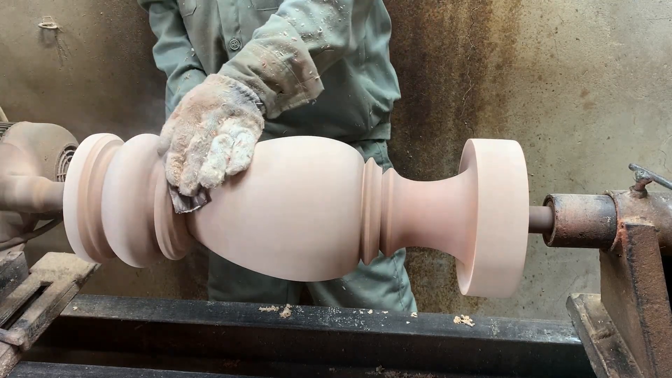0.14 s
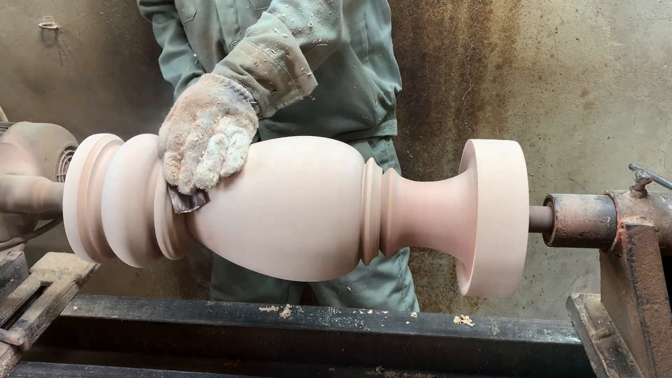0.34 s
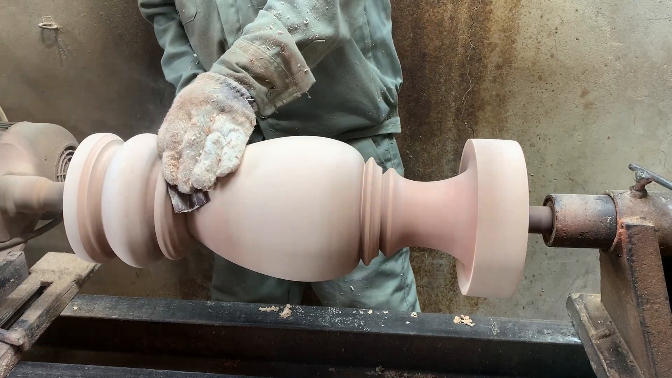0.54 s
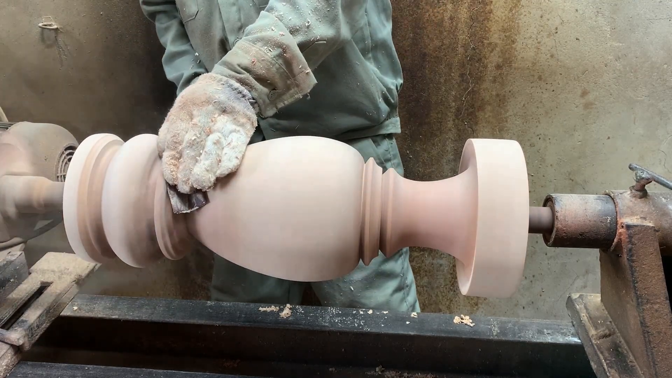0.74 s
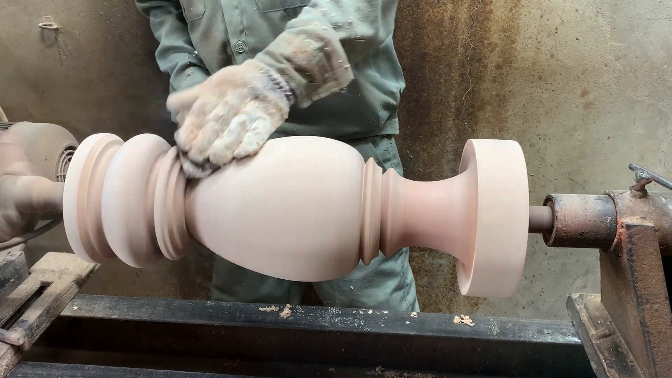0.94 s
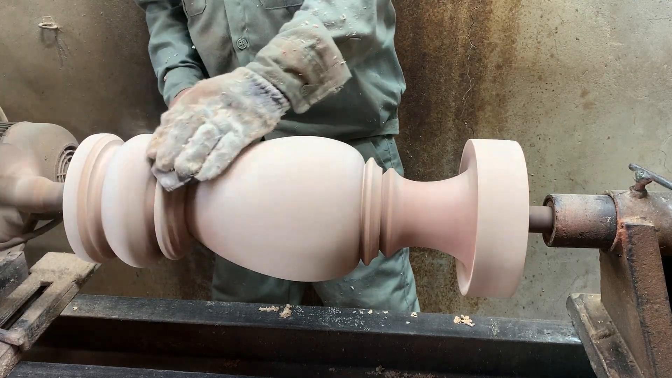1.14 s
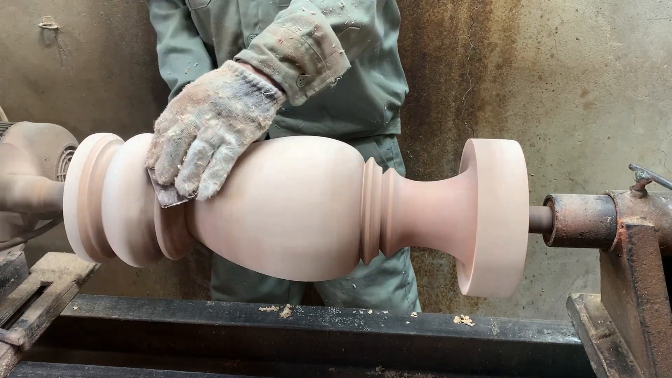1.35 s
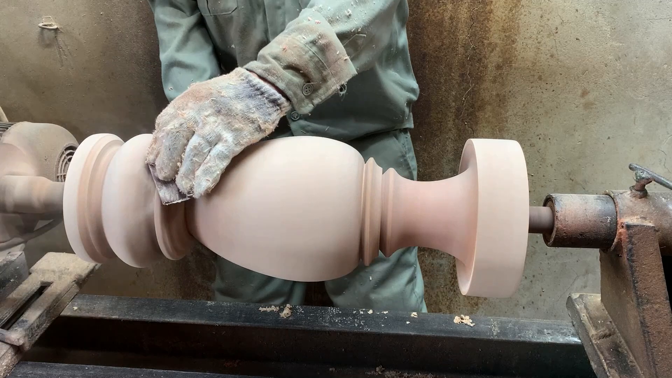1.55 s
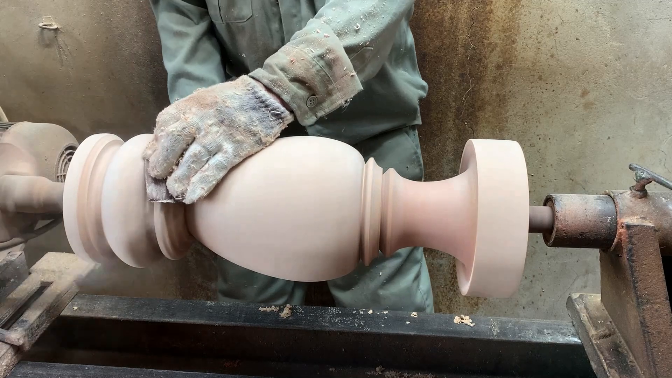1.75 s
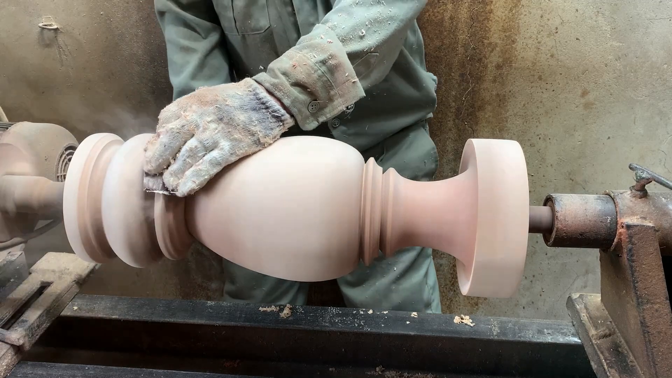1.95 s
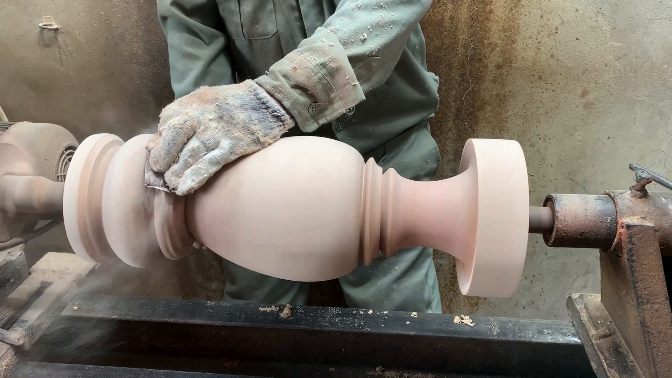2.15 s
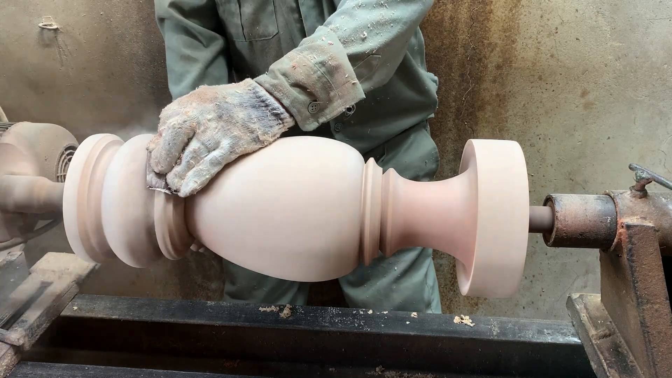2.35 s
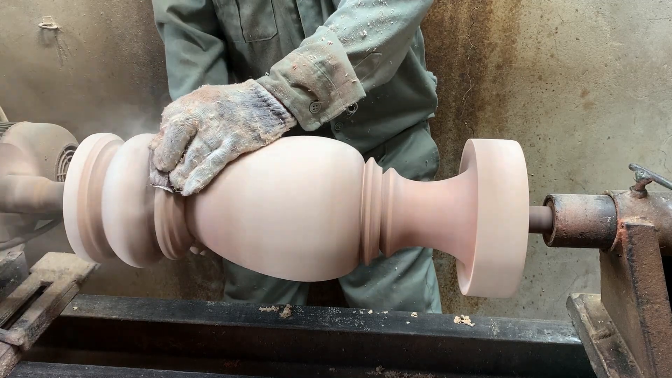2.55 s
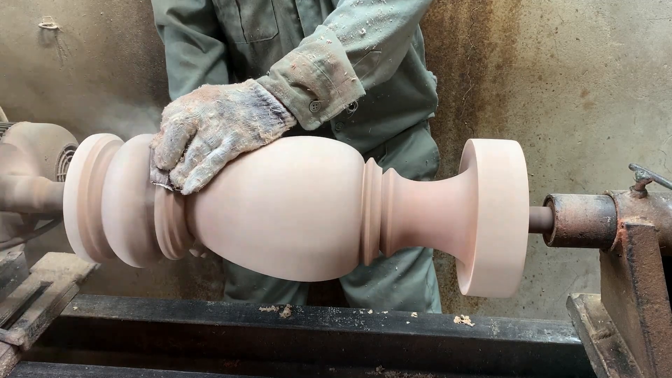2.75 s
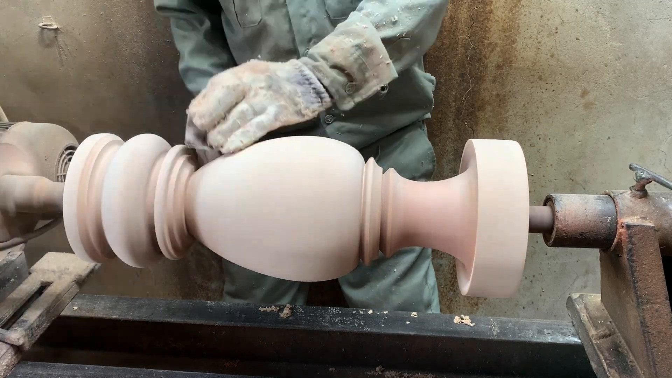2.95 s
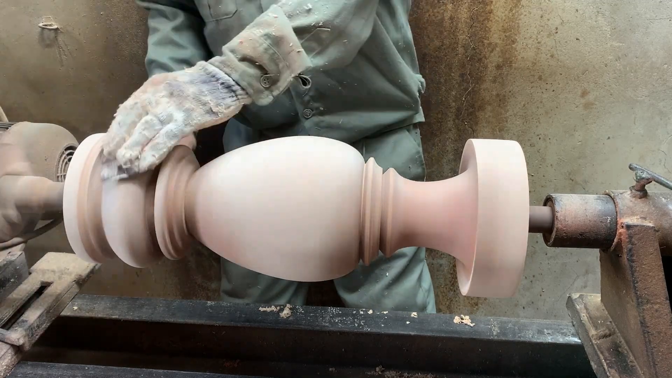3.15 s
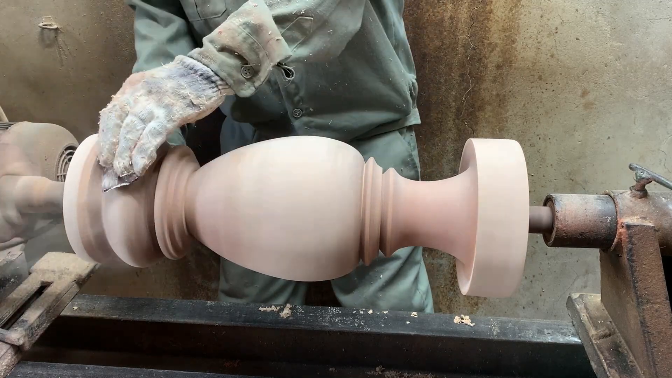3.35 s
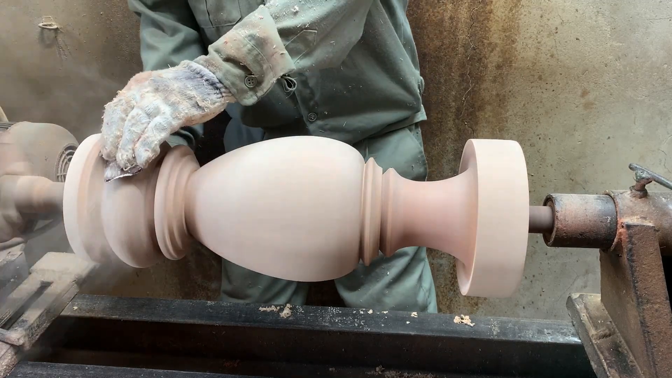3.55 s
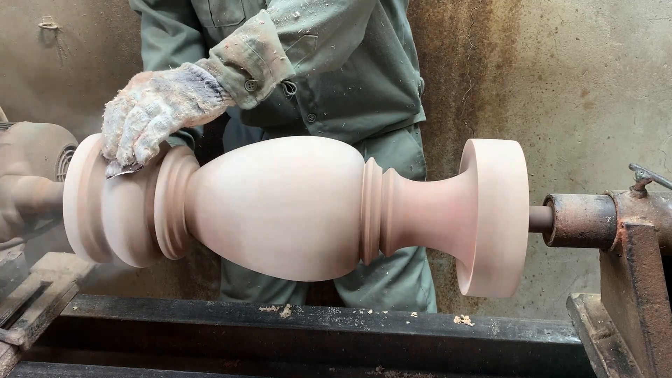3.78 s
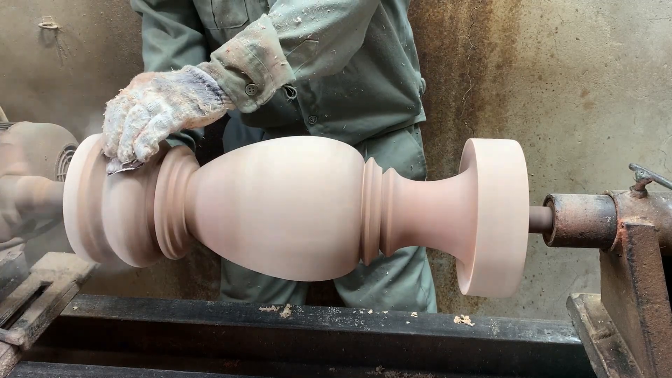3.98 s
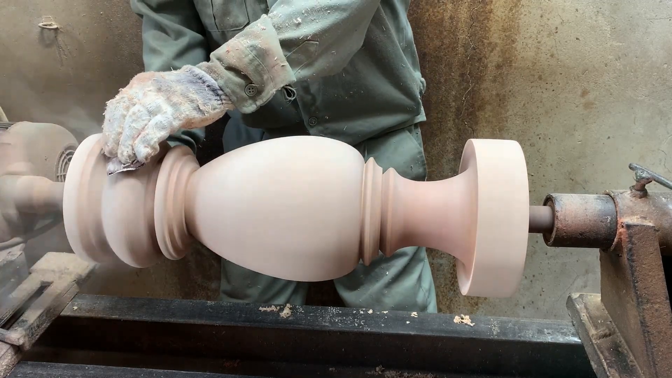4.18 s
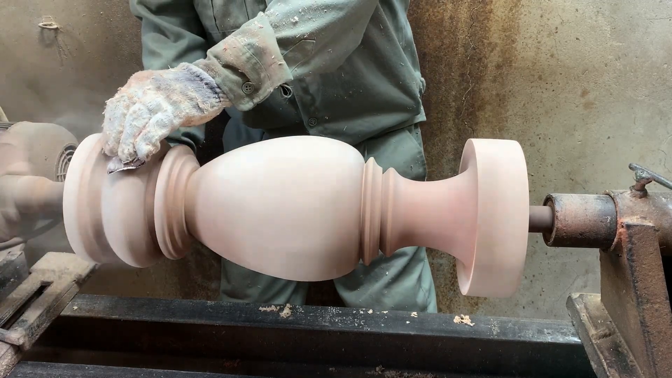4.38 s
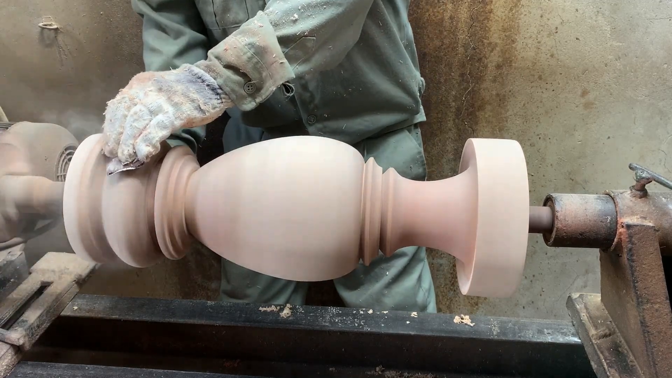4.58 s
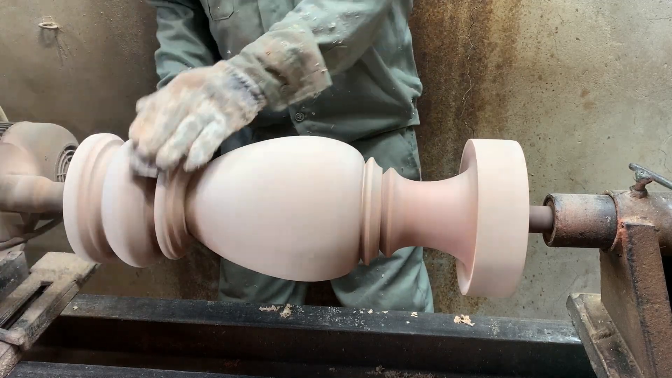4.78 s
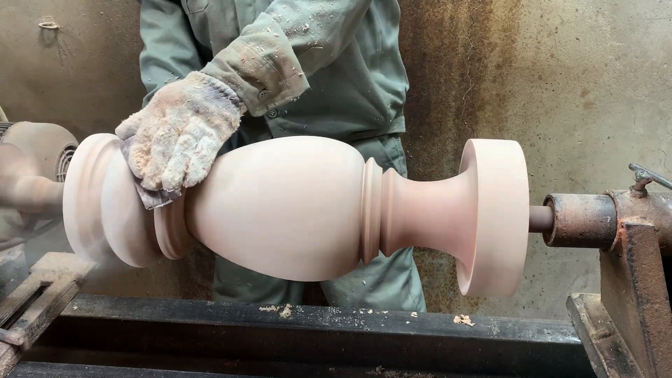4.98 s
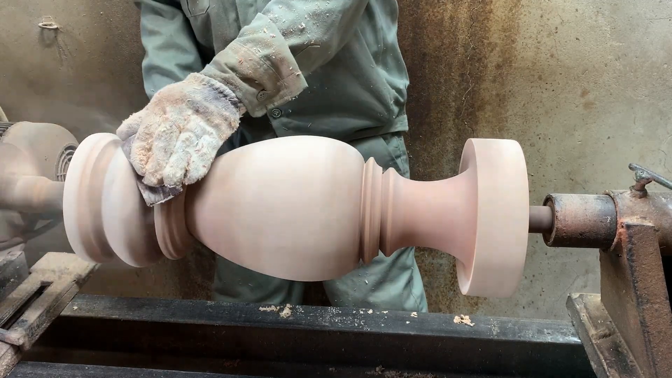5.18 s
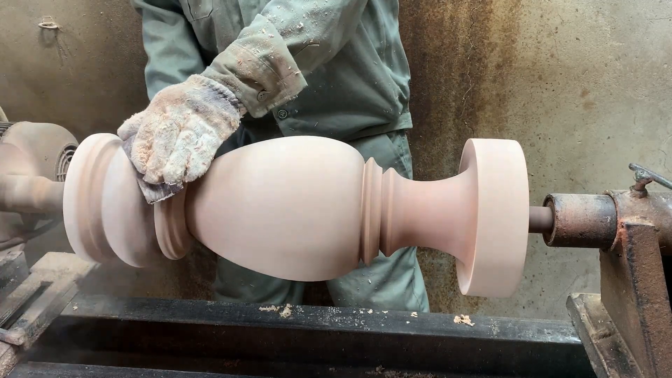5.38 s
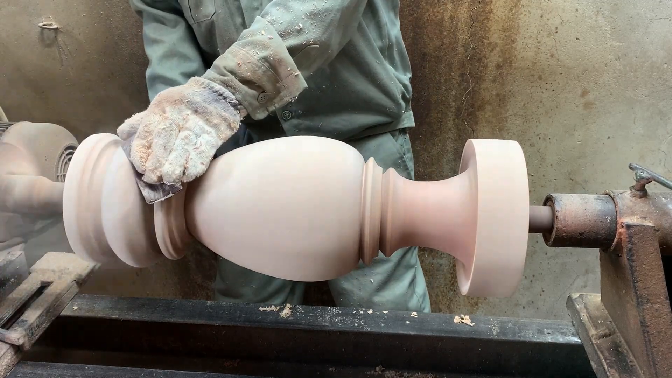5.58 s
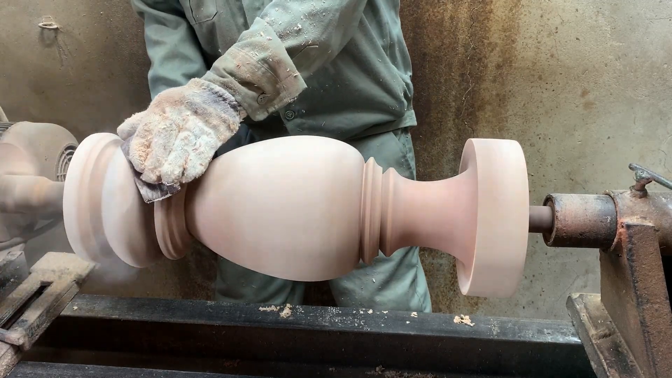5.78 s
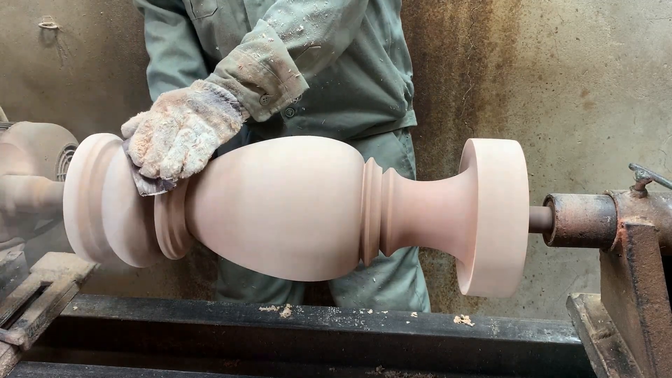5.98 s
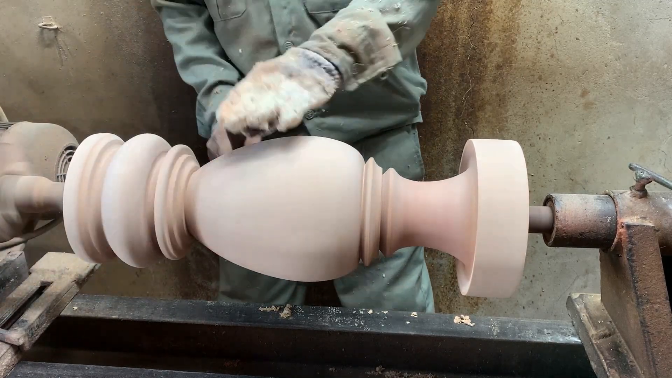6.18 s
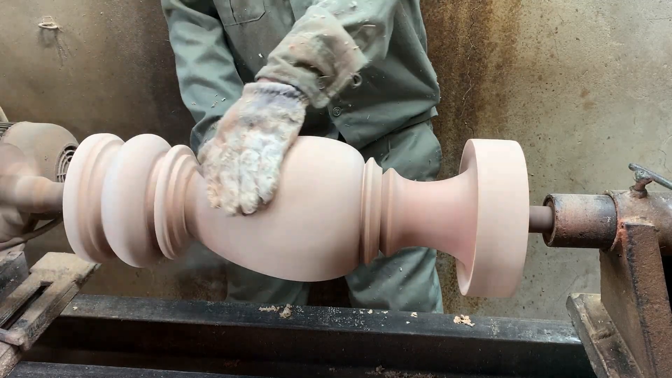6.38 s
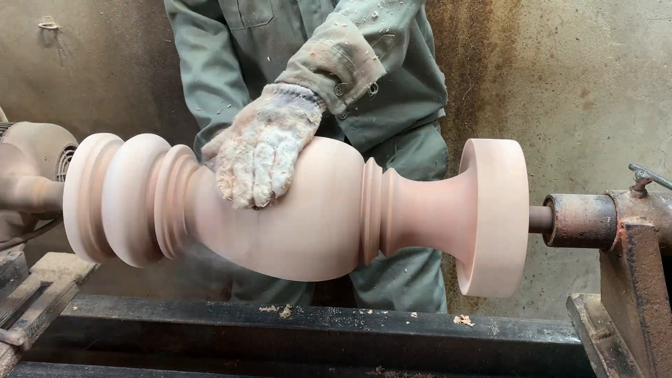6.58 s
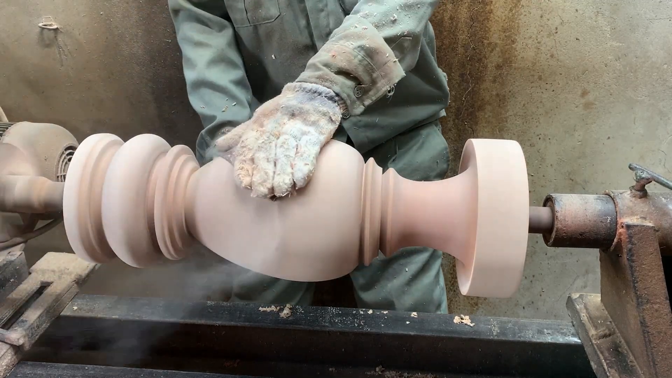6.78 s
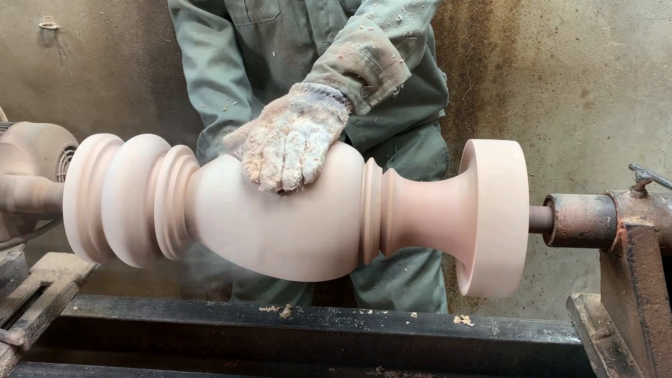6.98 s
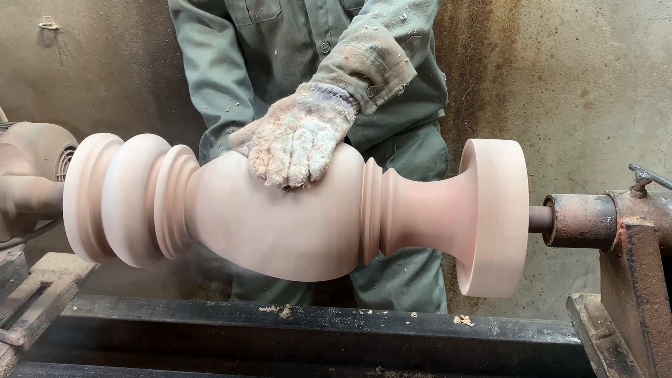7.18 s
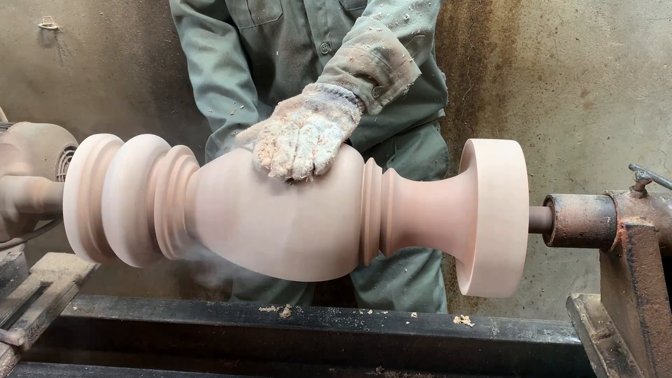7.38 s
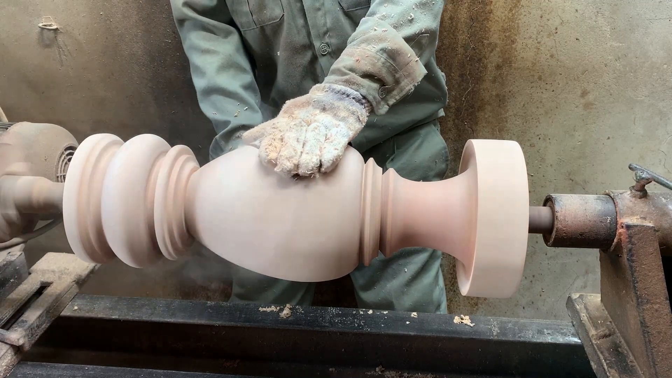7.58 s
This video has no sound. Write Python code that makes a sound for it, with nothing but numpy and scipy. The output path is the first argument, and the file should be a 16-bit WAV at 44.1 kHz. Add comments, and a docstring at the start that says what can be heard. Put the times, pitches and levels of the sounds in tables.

```python
"""Sanding a spinning baluster

A gloved hand holds sandpaper to a wooden baluster on a lathe: five strokes of filtered grain noise, short lifts.
Under the hiss, noise through iron-frame resonances throbs with the drive; sine tones make a faint controller whine.
The draught of the spinning wood buffets two microphone ports with low noise and soft thumps; one chip ticks.
A short decaying-noise echo follows the paper, and the right port rings near 8 kHz."""
import sys
import numpy as np
from scipy import signal
from scipy.fft import rfft, irfft, next_fast_len
from scipy.io import wavfile
from scipy.ndimage import uniform_filter1d, map_coordinates

SR = 44100
rng = np.random.default_rng(int(sys.argv[2]) if len(sys.argv) > 2 else 0)


def unload_wav(signal):
    """Save mono or channel-first audio to the path in sys.argv[1] as 16-bit WAV at rate SR, clipped to [-1, 1]."""
    wavfile.write(
        sys.argv[1],
        SR,
        np.round(np.clip(np.atleast_2d(signal).T, -1, 1) * 32767).astype(np.int16),
    )


N = 336473
TURN_HZ = 11.1  # spindle turns a second


def amp(db):
    """Decibels to gain."""
    return 10 ** (np.asarray(db) / 20)


def unit(x):
    """Scale to rms 1."""
    return x / np.sqrt(np.mean(x ** 2) + 1e-20)


def curves(rows):
    """One value per sample for each column after the time."""
    knot_s, *columns = np.transpose(rows)
    return [np.interp(np.arange(N) / SR, knot_s, column) for column in columns]


def wobble(rate):
    """A smooth random curve, rate knots a second."""
    knots = rng.standard_normal(int(N * rate / SR) + 4)
    return map_coordinates(knots, [np.arange(N) * rate / SR])


def white():
    """Unrelated noise for left and right, as in a diffuse sound field."""
    return rng.standard_normal((2, N))


def filtered(x, response):
    """x times a complex response of frequency."""
    size = next_fast_len(N + SR // 2)
    hz = np.fft.rfftfreq(size, 1 / SR)
    return irfft(rfft(x, size) * response(hz), size)[..., :N]


def coloured(x, points):
    """x through a spectrum of (pitch_hz, level_db) points on a log axis."""
    point_hz, point_db = np.transpose(points)
    return filtered(x, lambda hz: amp(np.interp(np.log(hz + 1), np.log(point_hz), point_db)))


def resonate(x, modes):
    """x through a set of (pitch_hz, width_hz, level_db) resonances, at rms 1."""
    def response(hz):
        return sum(amp(db) * 1j * hz * width / (centre ** 2 - hz ** 2 + 1j * hz * width)
                   for centre, width, db in modes)
    return unit(filtered(x, response))


def steady(x, evenness, span_s):
    """Even out the slow swings of a narrow-band ring, as a constant drive does."""
    power = np.abs(uniform_filter1d(np.mean(x ** 2, axis=0), size=int(span_s * SR)))
    return unit(x / (power + 1e-6) ** (evenness / 2))


# running noise of motor and bearings, relative spectrum: pitch_hz, level_db_per_hz
MACHINE_SPECTRUM = [(20, -5), (60, -8), (105, -17), (200, -1.5), (330, -14), (420, 1.5), (520, -9),
                    (950, -12), (1600, -15), (2600, -18.5), (4500, -26.5), (6100, -27.5), (7500, -39),
                    (12000, -66)]
# speed controller's switching tone and sidebands: pitch_hz, level_db
WHINE_TONES = [(12030, -71), (11930, -76), (12660, -79), (12560, -86)]


def machine(level_db=-41):
    """Steady rush of motor and bearings, with the controller's slightly unsteady whine."""
    t = np.arange(N) / SR
    whine = sum(amp(db) * np.sin(2 * np.pi * hz * t + 0.6 * wobble(90)) for hz, db in WHINE_TONES)
    return amp(level_db) * unit(coloured(white(), MACHINE_SPECTRUM)) + whine


# gusts of air on the microphone: start_s, end_s, strength_db (before the overall level)
GUSTS = [(0.0, 0.104, -36), (.15, .95, -42.5), (.3, .43, -33.5), (1.003, 1.356, -32), (1.425, 1.88, -39.5),
         (1.93, 2.17, -36), (2.54, 2.624, -35), (2.794, 3.074, -38.5), (3.203, 3.406, -33.5),
         (3.504, 3.747, -32.5), (3.75, 4.622, -41), (3.953, 4.32, -35), (4.66, 4.867, -35.5),
         (5.03, 5.332, -35.5), (5.395, 5.573, -33), (5.965, 6.094, -34), (6.24, 6.383, -36.5),
         (6.4, 6.76, -43), (7.056, 7.48, -38)]
# low rumble of the moving air, relative spectrum: pitch_hz, level_db_per_hz
BUFFET_SPECTRUM = [(12, -27), (30, -6), (60, -3), (105, 2), (170, -4.5), (250, -8), (400, -15.5),
                   (800, -26), (2000, -60)]
# brighter slap of the harder gusts, relative spectrum: pitch_hz, level_db_per_hz
SLAP_SPECTRUM = [(60, -28), (160, 1), (300, -7), (500, -5), (1200, -46), (4000, -80)]
CALM_DB, GUST_EDGE_S = -44.5, 0.08  # strength between gusts; time a gust takes to come or go


def draught(gust_db=2.0, lump_db=3.0, level_db=1.0, slap_db=-9, slap_growth=2.3):
    """Gusts reach both ports together, their eddies separately; hard gusts are brighter."""
    t = np.arange(N) / SR
    strength = np.full(N, amp(CALM_DB))
    for start_s, end_s, db in GUSTS:
        swell = np.clip(0.5 + np.minimum(t - start_s, end_s - t) / GUST_EDGE_S, 0, 1)
        strength = np.maximum(strength, amp(db) * swell)
    eddies = np.array([wobble(80), wobble(80)])
    flow = strength * unit(amp(gust_db * wobble(22) + lump_db * eddies))
    rumble = coloured(white() * flow, BUFFET_SPECTRUM)
    slap = coloured(white() * flow ** slap_growth, SLAP_SPECTRUM)
    level = np.sqrt(np.mean(strength ** 2))
    return level * amp(level_db) * (unit(rumble) + amp(slap_db) * unit(slap))


# strongest eddies, heard as soft thumps: start_s, push_db (before gain and filter)
THUMPS = [(0.352, -25), (1.16, -29), (1.288, -20), (1.441, -23), (1.582, -26), (1.83, -27), (2.049, -23),
          (2.565, -33), (3.208, -23), (3.343, -20), (3.538, -22), (3.677, -30), (4.001, -26), (4.243, -15),
          (4.68, -23), (4.75, -22), (4.836, -24), (5.093, -26), (5.253, -31), (5.299, -23), (5.438, -22),
          (5.488, -23.5), (6.044, -20.5), (6.286, -37), (7.108, -21), (7.491, -28)]


def thumps(push_s=0.0035, level_db=-2, flutter=0.25, flutter_t60=0.08):
    """A big eddy is one low push on the diaphragm, with a short flutter that dies away."""
    out = np.zeros((2, N + SR))
    t = np.arange(SR // 8) / SR
    for start_s, db in THUMPS:
        # each port meets its own part of the eddy
        u = t / (push_s * np.exp(0.26 * rng.standard_normal((2, 1))))
        push = 2 * u * (2 - u) * np.exp(-u) * rng.choice([-1, 1], (2, 1))
        wake = unit(uniform_filter1d(rng.standard_normal((2, len(t))), size=80))
        wake = wake * amp(-60 * t / flutter_t60)
        first = round(start_s * SR)
        out[:, first:first + len(t)] += amp(db + level_db) * (push + flutter * wake)
    return coloured(out[:, :N], [(20, -5), (70, 2.5), (250, 9), (500, -13), (1500, -35), (5000, -70)])


# a chip on the lathe bed: start_s, strike_db (scales click and ring)
TICKS = [(4.818, -21)]


def ticks(t60=0.0022, ring_hz=6550, ring_db=-29, ring_t60=0.1):
    """A flying chip: a sharp noise click and a faint sine ring of steel, both dying away."""
    out = np.zeros((2, N))
    for start_s, db in TICKS:
        age = np.maximum(np.arange(N) / SR - start_s, 0)
        click = 0.5 * white() * amp(-60 * age / t60) * (age > 0)
        ring = amp(ring_db - 60 * age / ring_t60) * np.sin(2 * np.pi * ring_hz * age)
        out += amp(db) * (click + ring)
    return out


# load on the drive, as frame levels before a small gain: time_s, ring_db (upper), drone_db (lower)
LOAD = [(0.0, -41.5, -37), (0.3, -33.5, -34.5), (0.65, -36, -37.5), (0.88, -33.5, -38), (1.15, -41.5, -34),
        (1.35, -34, -36), (1.7, -35, -35), (1.95, -32, -32.5), (2.4, -30.5, -36), (2.87, -32.5, -35.5),
        (3.02, -48.5, -43.5), (3.42, -32.5, -32), (3.9, -30, -33.8), (4.25, -29.5, -32.5),
        (4.48, -31, -38.5), (4.8, -42.5, -40), (5.25, -37.5, -39.5), (5.5, -36.4, -37), (5.9, -34, -36.5),
        (6.22, -42.5, -43.5), (6.5, -37.5, -37), (7.63, -34.5, -35.5)]
# upper frame resonances: pitch_hz, width_hz, level_db (relative)
RING_MODES = [(1311, 45, 10), (1235, 17, -7.5)]
# lower frame resonances: pitch_hz, width_hz, level_db (relative)
DRONE_MODES = [(624.8, 58, 6.5), (423, 19, -4.5), (526, 100, -12)]
WORKING_DB = -35  # ring level in LOAD under ordinary sanding
THROB_HZ, SAG_HZ_PER_DB = 37.8, 0.05  # throbs a second at that load; more load slows the drive


def drive(ring_depth_db=6.0, drone_depth_db=1.0, flutter_hz=117.8, flutter_db=2, turn_db=1.0,
          unrest_db=0.97, ring_gain_db=-0.14, drone_gain_db=1.0):
    """The drive rings the frame in quick throbs; the upper ring also flutters and sways each turn."""
    t = np.arange(N) / SR
    ring_db, drone_db = curves(LOAD)
    rate_hz = THROB_HZ - SAG_HZ_PER_DB * (ring_db - WORKING_DB)
    throb = np.cos(2 * np.pi * np.cumsum(rate_hz) / SR)
    sway_db = turn_db * np.sin(2 * np.pi * TURN_HZ * t) + unrest_db * wobble(20)
    flutter = flutter_db * np.cos(2 * np.pi * flutter_hz * t)
    ring = steady(resonate(white(), RING_MODES), evenness=0.34, span_s=0.02)
    ring = ring * amp(sway_db + flutter - ring_depth_db * throb)
    drone = steady(resonate(white(), DRONE_MODES), evenness=0.083, span_s=0.041)
    drone = drone * amp(-drone_depth_db * throb)
    # the frame radiates little away from its resonances
    ring = unit(coloured(ring, [(500, -35), (950, -0.5), (1200, 5.5), (1420, 3.0), (1700, -39),
                                (3500, -27), (9000, -50)]))
    drone = unit(coloured(drone, [(150, -27), (400, 2.0), (680, 0.5), (900, -9.5), (2000, 5.0),
                                  (8000, -19)]))
    return amp(ring_db + ring_gain_db) * ring + amp(drone_db + drone_gain_db) * drone


FIRST_TOUCH = 0.16  # share of the full pressure at the moment of contact


def pressure(touch_s, lift_s, settle_s, ease_s):
    """One stroke, 0-1: the paper lands lightly, the hand leans in, holds, then eases off."""
    t = np.arange(N) / SR
    lean = 1 - (1 - FIRST_TOUCH) * np.exp(-np.maximum(t - touch_s, 0) / settle_s)
    release = (1 - np.tanh((t - lift_s) / (2 * ease_s))) / 2
    return (t >= touch_s) * lean * release


# strokes of the paper, for the rub and the sanding; hiss, rasp, fizz and graze before layer gains:
# touch_s, lift_s, settle_s, ease_s, hiss_db, hiss_drift_db_per_s, rasp_db, rasp_drift_db_per_s,
# fizz_db, rub_db (hollow), graze_db (after the lift)
STROKES = [ (0.0, 0.996, 0.033, 0.011, -39, -3.5, -41, -2.5, -48, -37, -58),
           (1.165, 2.932, .05, 0.019, -32.5, 1, -33.5, -1, -47, -48, -75),
           (3.171, 4.675, 0.045, .018, -32.5, 1.5, -34.5, 2.5, -46.5, -44, -61),
           (4.863, 6.106, 0.022, 0.019, -34, 0, -39.5, 3, -46, -50, -63),
           (6.316, 7.8, 0.094, .015, -32.5, 2, -37.5, -2, -47, -43, -75)]
# low resonances of the workpiece: pitch_hz, width_hz, level_db (relative)
WOOD_MODES = [(474, 46, -6), (555, 190, -9)]


def rub():
    """Pressed flat, the paper also stirs the workpiece's own low resonances."""
    level = np.zeros(N)
    for touch_s, lift_s, settle_s, ease_s, *_, rub_db, _ in STROKES:
        level += amp(rub_db) * pressure(touch_s, lift_s, settle_s, ease_s)
    stir = coloured(white(), [(150, -1), (400, -5.5), (650, -13), (1500, 1)])
    return level * resonate(stir, WOOD_MODES)


def grit(spectrum, spike_db, patchy_db):
    """Countless abrasive grains of unequal size tear wood fibres; the colour shifts as the paper flexes."""
    grains = white() * amp(spike_db * rng.uniform(-1.6, 1, N))
    bins = signal.stft(grains, nperseg=512)[2]
    field = uniform_filter1d(rng.standard_normal(bins.shape[1:]), size=5, axis=0)  # smooth over pitch
    field = uniform_filter1d(field, size=14, axis=1)  # and over time
    patchy = signal.istft(bins * amp(patchy_db * unit(field)), nperseg=512)[1][:, :N]
    return unit(coloured(patchy, spectrum))


def grip(tightest_s, width_s, db):
    """The fingers close the paper round a contour and relax again."""
    t = np.arange(N) / SR
    return amp(db) / (1 + ((t - tightest_s) / width_s) ** 2)


# abrasion in three overlapping ranges, relative spectra: pitch_hz, level_db_per_hz
RASP_SPECTRUM = [(250, -52), (700, -18), (1300, -8.5), (1900, -3.5), (2700, -2), (3200, -0.5), (3750, 2),
                 (4300, 0.5), (5200, -5.5), (7500, -35)]
HISS_SPECTRUM = [(1500, -34), (3200, -9.5), (4400, -2), (5200, 0.5), (7200, 1), (8000, -7), (9000, -12),
                 (10000, -20), (12000, -30), (15000, -55)]
FIZZ_SPECTRUM = [(6500, -26), (7500, -2), (8200, 2.5), (9300, -2.5), (10800, -9), (12000, -7),
                 (13500, -11.5), (15600, -21)]
# resonances of paper squeezed into a groove: pitch_hz, width_hz, level_db (relative)
GROOVE_MODES = [(3720, 480, 0), (4450, 270, -4)]
# resonances of paper wrapped over a bead: pitch_hz, width_hz, level_db (relative)
BEAD_MODES = [(1538, 35, 6), (1917, 110, -0.5), (4270, 480, -9)]
# squeezes into a groove, level at full pressure: tightest_s, half_width_s, level_db
GROOVE_SQUEEZES = [(1.34, 0.033, -40), (1.73, 0.074, -32.5), (1.85, .6, -36)]
# the one wrap over a bead, level at full pressure: tightest_s, half_width_s, level_db
BEAD_WRAP = (3.96, .55, -36.3)
RASP_POWER, FIZZ_POWER = 1.47, 1.12  # each grows as this power of the pressure: a light touch rasps little
HOVER_S = 0.19  # after a lift the paper's edge still grazes the wood for this long


def sanding(runout_db=0.48, tremor_db=0.59, chatter_db=0.5):
    """Grains hiss, rasp and fizz with the pressure; hand tremor and each turn of the wood vary the level."""
    t = np.arange(N) / SR
    rasp = amp(3.0) * grit(RASP_SPECTRUM, spike_db=7, patchy_db=2.0)
    hiss = amp(3.0) * grit(HISS_SPECTRUM, spike_db=9.5, patchy_db=1.68)
    fizz = amp(8) * grit(FIZZ_SPECTRUM, spike_db=8.5, patchy_db=0.9)
    scrape = grit(RASP_SPECTRUM, spike_db=12, patchy_db=3.5)
    squeeze = sum(grip(*row) for row in GROOVE_SQUEEZES)
    folded = squeeze * resonate(scrape, GROOVE_MODES) + grip(*BEAD_WRAP) * resonate(scrape, BEAD_MODES)
    out = np.zeros((2, N))
    for (touch_s, lift_s, settle_s, ease_s, hiss_db, hiss_drift, rasp_db, rasp_drift,
         fizz_db, _, graze_db) in STROKES:
        press = pressure(touch_s, lift_s, settle_s, ease_s)
        from_middle_s = t - (touch_s + lift_s) / 2
        graze = amp(graze_db) * (t > lift_s) * (t < lift_s + HOVER_S)
        out += (press * amp(hiss_db + hiss_drift * from_middle_s) + graze) * hiss
        out += press ** RASP_POWER * (amp(rasp_db + rasp_drift * from_middle_s) * rasp + folded)
        out += press ** FIZZ_POWER * amp(fizz_db) * fizz
    runout = runout_db * np.sin(2 * np.pi * TURN_HZ * t)
    return out * amp(runout + tremor_db * wobble(25) + chatter_db * wobble(160))


# the workshop's echo: pitch_hz, t60_s
WORKSHOP_DECAY = [(300, 0.15), (3000, 0.23), (8000, 0.21), (15000, 0.085)]


def workshop(x):
    """Walls return a short tail whose top treble dies first; its pattern is redrawn as the hand moves."""
    out = np.zeros((2, N))
    block = SR // 5  # a new pattern every 0.2 s
    for start in range(0, N, block):
        hz, t, bins = signal.stft(rng.standard_normal((2, SR // 3)), SR, nperseg=256)
        t60 = np.interp(hz, *np.transpose(WORKSHOP_DECAY))
        tail = signal.istft(bins * amp(-60 * t / t60[:, None]), SR, nperseg=256)[1]
        tail = tail / np.linalg.norm(tail[0])
        echo = signal.fftconvolve(x[:, start:start + block], tail, axes=1)[:, :N - start]
        out[:, start:start + echo.shape[1]] += echo
    return out


def scene():
    """Everything at the two microphone ports; only the paper gets the echo."""
    lathe = machine() + drive() + rub()
    air = draught() + thumps()
    paper = sanding()
    return lathe + air + ticks() + paper + amp(-12.5) * workshop(paper)


# resonance of the right microphone port: pitch_hz, gain_db
PORT_RESPONSE = [(1000, 1), (2200, 1.1), (4000, 0), (7600, 0.5), (7880, 3.5), (8040, 16.5), (8500, 12.5),
                 (9200, 8), (10000, 6.5), (10700, 3), (12000, 2), (14000, 0.5)]
TOP_HZ = 15750  # band limit


def record(dry):
    """The right port adds its resonance; nothing passes above the band limit."""
    ports = np.array([dry[0], coloured(dry[1], PORT_RESPONSE)])
    return filtered(ports, lambda hz: hz < TOP_HZ)


dry = scene()
out = record(dry)
unload_wav(out)
```